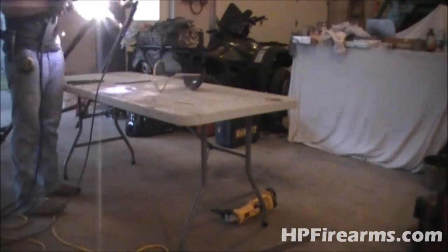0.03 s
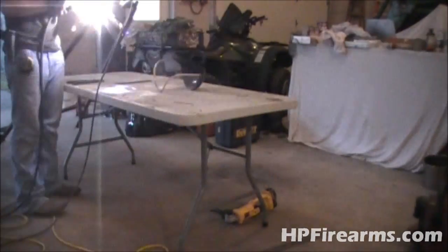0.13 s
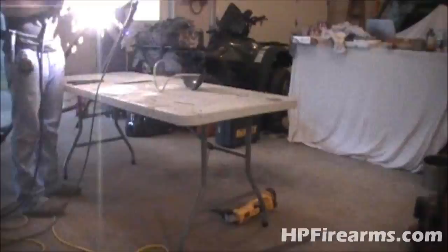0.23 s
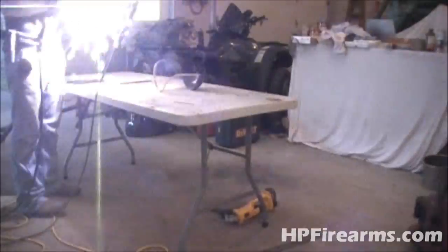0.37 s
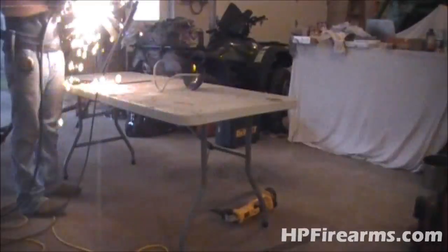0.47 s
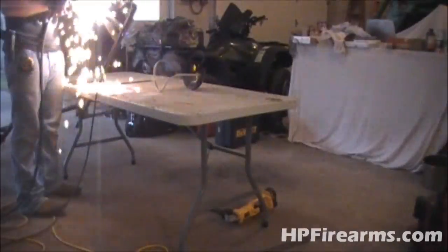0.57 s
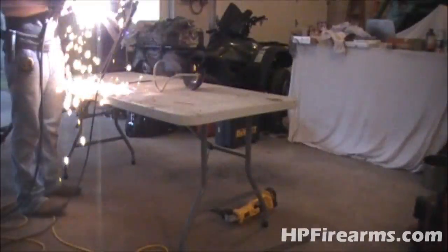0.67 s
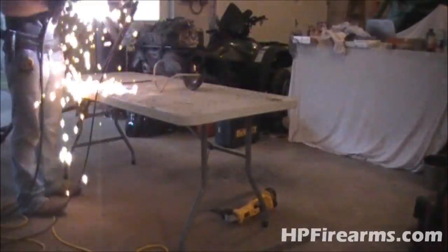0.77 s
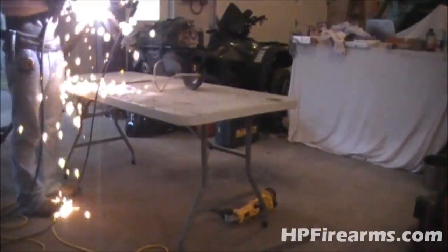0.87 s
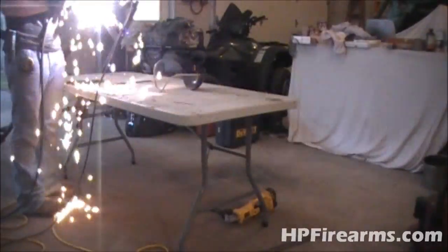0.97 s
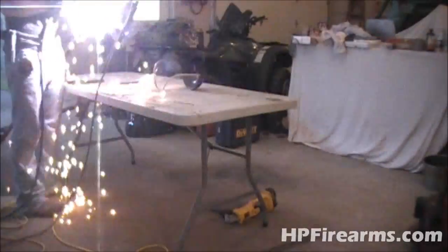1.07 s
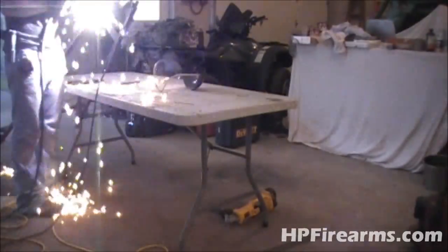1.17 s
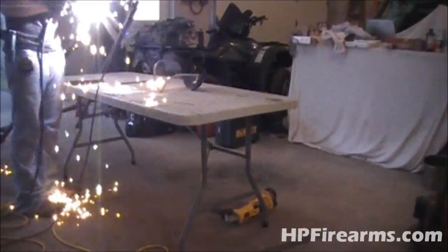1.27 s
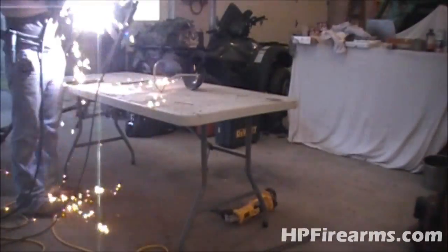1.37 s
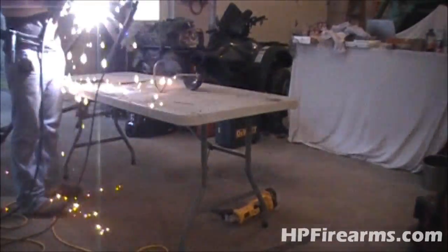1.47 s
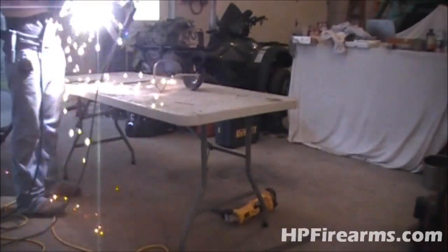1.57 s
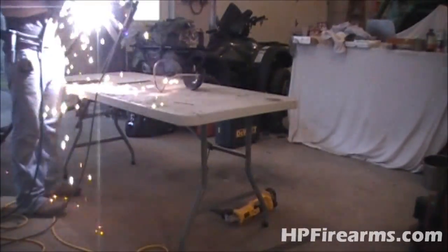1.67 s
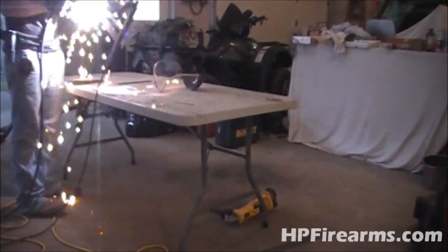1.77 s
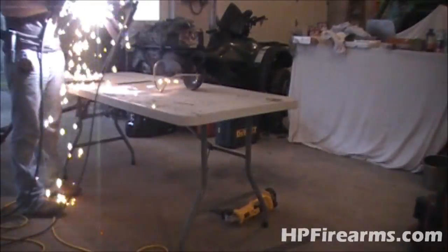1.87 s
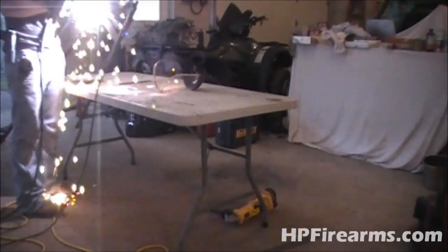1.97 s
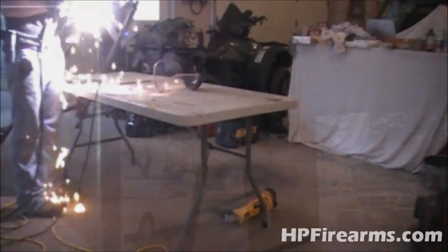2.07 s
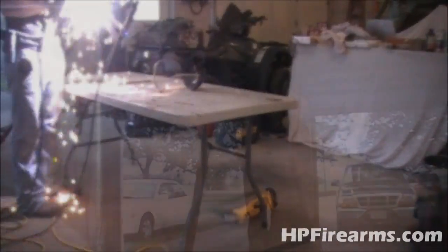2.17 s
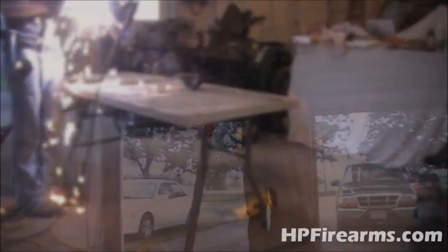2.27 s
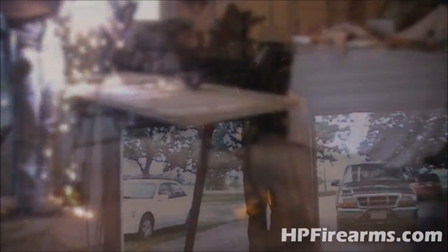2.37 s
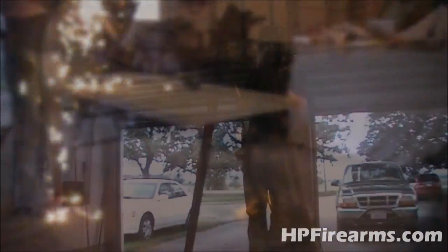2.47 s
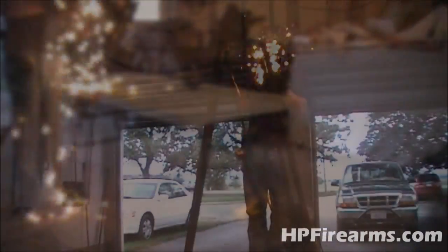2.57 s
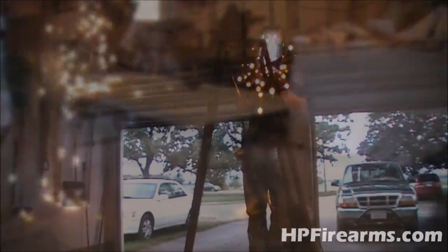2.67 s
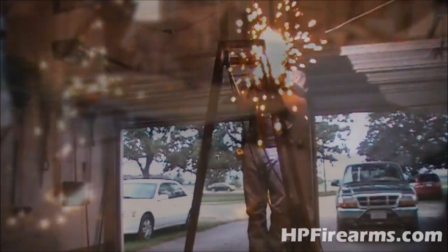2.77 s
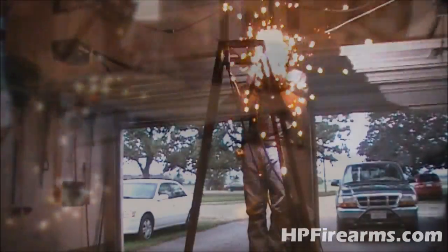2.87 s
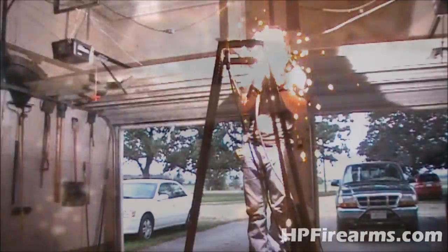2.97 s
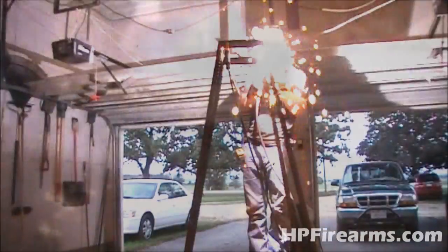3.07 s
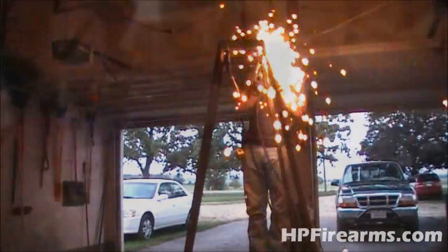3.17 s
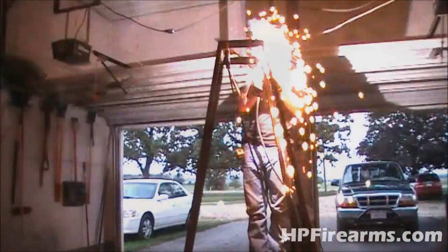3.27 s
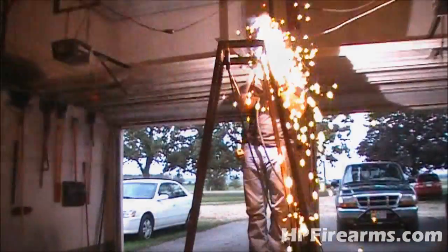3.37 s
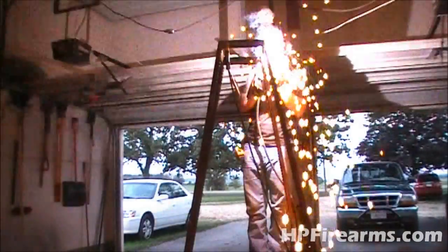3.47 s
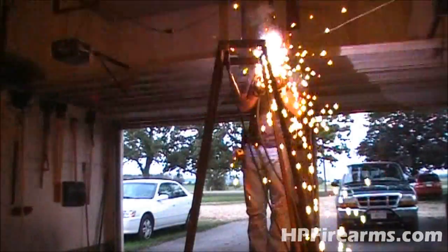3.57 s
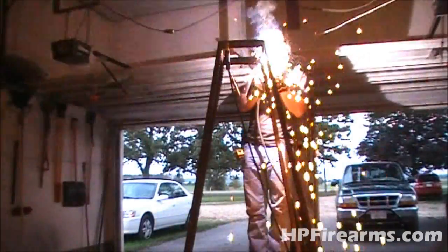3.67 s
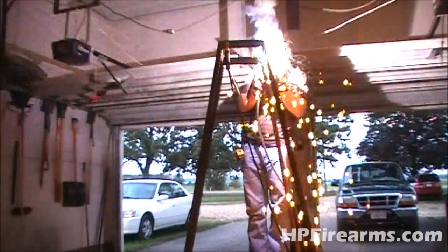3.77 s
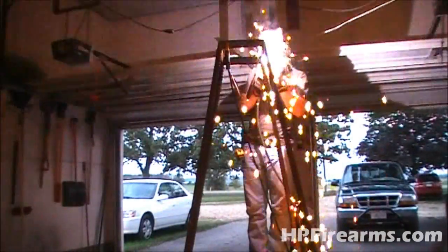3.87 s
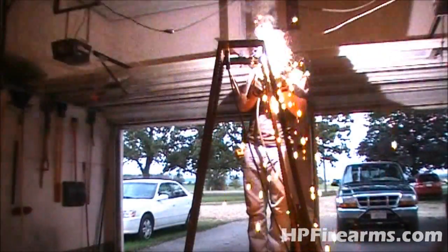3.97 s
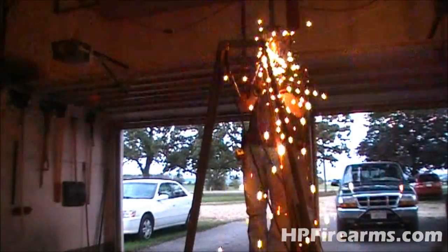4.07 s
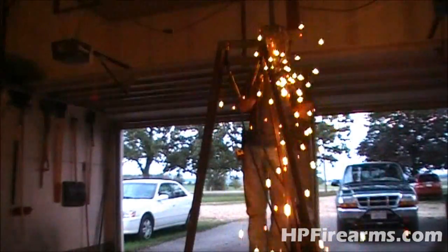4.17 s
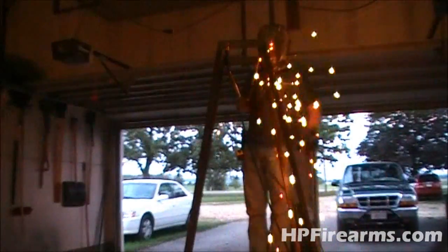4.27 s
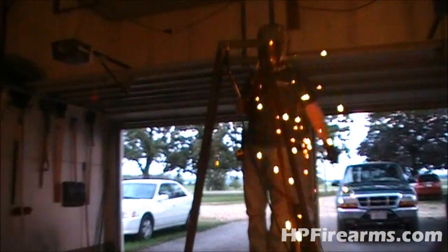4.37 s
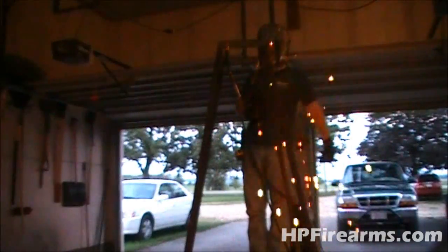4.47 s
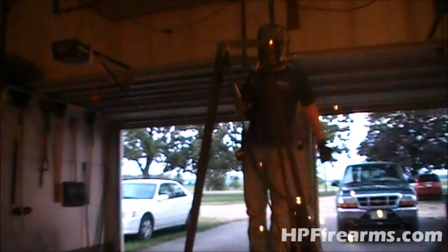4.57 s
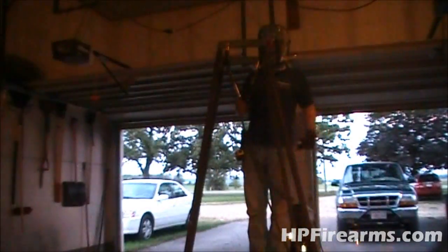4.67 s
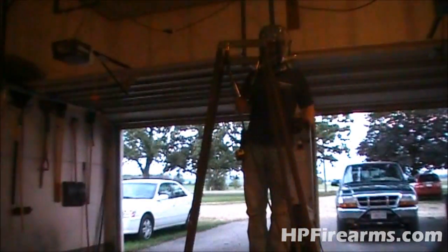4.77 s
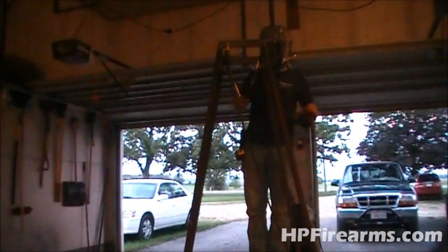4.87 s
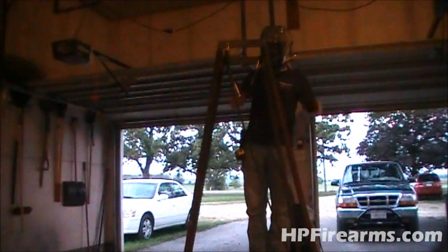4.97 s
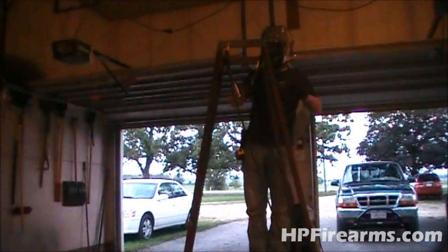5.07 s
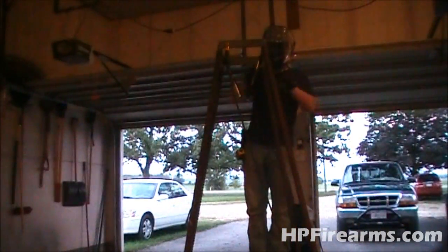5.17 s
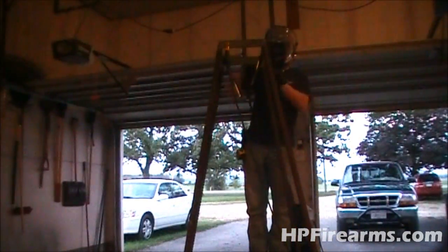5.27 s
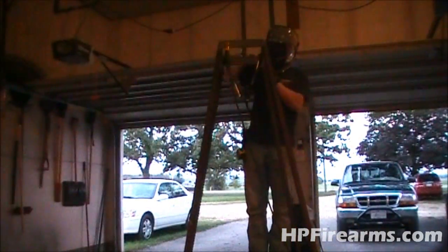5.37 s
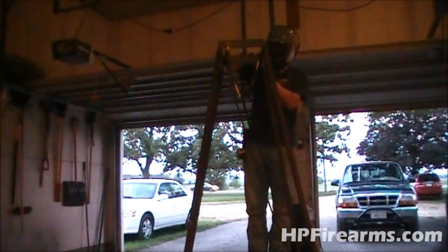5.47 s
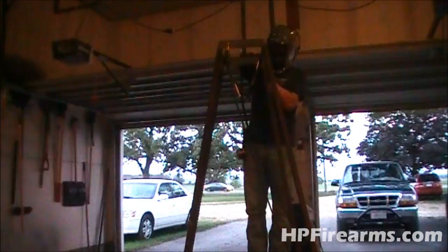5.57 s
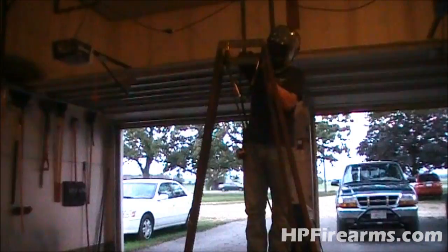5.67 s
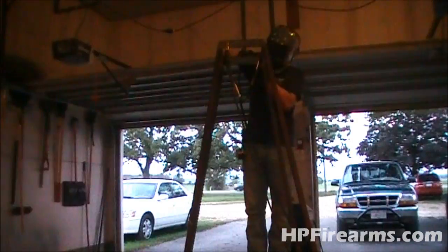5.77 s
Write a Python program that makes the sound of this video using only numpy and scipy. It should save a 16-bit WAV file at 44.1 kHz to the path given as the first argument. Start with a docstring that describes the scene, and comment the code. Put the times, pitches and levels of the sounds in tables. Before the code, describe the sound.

An electric arc welder is sizzling from the start, fairly close, in a bare, ringing garage. Its bright, dense crackle is dotted with sharp, irregular pops of bursting molten drops, brief stutters and faint whistles and hisses of gas. The welder's cooling fan whirs quietly underneath, joined by a low hum at about 2 seconds.

At around 2.5 seconds the arc dips and a second weld strikes with a cluster of loud cracks. It chokes for a moment, then burns on with more hiss and buzz, scattered pops and a few dull puffs. The arc stops just after 4 seconds and the room rings out briefly. The cooling slag ticks once at about 4.4 seconds. From there until the end, near 5.8 seconds, only the soft, slightly wavering whir of the fan and its low hum remain.

```python
"""A garage: arc welding at a bench, then overhead from a ladder by the open door.
The arc sizzles with tiny sparks that swell at twice the mains frequency. Molten drops choke it
and pop; gas whistles, hisses and puffs from the melt. The bare room rings on when the arc stops,
and the slag ticks once. The welder's cooling fan whirs underneath, at the ladder with a low hum."""
import sys
import numpy as np
from scipy import signal
from scipy.fft import rfft, irfft
from scipy.io import wavfile

SR = 44100
rng = np.random.default_rng(int(sys.argv[2]) if len(sys.argv) > 2 else 0)


def master(y):
    """Save y as 16-bit WAV."""
    cut = np.clip(np.atleast_2d(y).T, -1, 1)
    pcm = np.round(cut * 32767)  # scale
    wavfile.write(sys.argv[1], SR, pcm.astype(np.int16))


N = 257103
TIME = np.arange(N) / SR
MAINS_HZ = 60
LADDER_FROM_S, STRIKE_S = 2.0, 2.48  # ladder scene: fan comes in, arc is struck
RELIGHT_S = 0.0088  # time for the arc to catch
# Bursting drops. Each row: start in seconds, relative peak in dB, thump offset in dB.
DROP_BURSTS = [(0.0181, -2, -9), (0.04, -3, -8), (.0822, -11, -20), (0.0922, -5, -22), (0.166, -7, -9),
               (.1918, -2, -14), (.233, -0.5, -29), (0.2823, -1.5, -15), (.3245, -9, -22),
               (0.4748, 0, -4.5), (.4992, -5, -26), (0.5075, -8, -24), (.5397, -10, -24),
               (0.5427, -12, -24), (0.5797, -12, -24), (.6078, -11, -22), (.7183, -9, -21), (.79, -9, -26),
               (0.8433, -10, -15), (0.8905, -7, -22), (0.8936, -10, -22), (0.9416, -2.5, -26),
               (1.0395, -1, -10), (1.0817, -5, -25), (1.124, -8, -22), (1.191, -13, -22), (1.2185, -9, -20),
               (1.2245, -12, -16), (1.2498, -6.5, -16), (1.4336, -2.5, -15), (1.4485, -4, -14),
               (1.6833, -4.5, -32), (1.8484, -8, -23), (2.141, -6, -8), (2.2577, -3, -3),
               (2.2657, -10, -15.5), (2.3496, -5, -18), (2.3668, -6, -2), (2.3746, -9, -6),
               (2.408, -7, -20), (2.4247, -9, -20), (2.489, -3, -20), (2.4978, 2.5, -12),
               (2.4997, -0.5, -9), (2.5056, 3, -19), (2.6856, -6, -22), (2.6906, -2, -18),
               (2.7138, 2.5, -14), (2.7303, 3, -15), (2.7813, -5, -28), (2.798, -2, -22), (2.8713, -3, -22),
               (2.8863, 1, -26), (2.8947, -6, -24), (2.905, -1, -24), (2.9134, 0, -23), (3.2041, -0.5, -6),
               (3.231, 0, -10), (3.2455, -4, -19), (3.3152, 2, -20), (3.399, 2, -21), (3.5829, -4, -20),
               (3.6737, -2, -21), (3.9554, 3, -26), (3.9657, -1, -28), (4.0382, 4, -20)]


def amp(db):
    """Decibels to gain."""
    return 10 ** (np.asarray(db) / 20)


def unit_rms(x):
    """Scale to rms 1."""
    return x / np.sqrt(np.mean(x ** 2) + 1e-20)


def at_hz(points, hz):
    """Interpolate (Hz, value) rows on a log-frequency axis."""
    f, value = np.transpose(points)
    return np.interp(np.log(hz + 1), np.log(f), value)


def envelope(rows):
    """Gain per sample from (seconds, dB) rows."""
    s, db = np.transpose(rows)
    return amp(np.interp(TIME, s, db))


def arch(start_s, length_s):
    """Half-sine swell and fade."""
    return np.sin(np.pi * np.clip((TIME - start_s) / length_s, 0, 1))


def noise(gain_at):
    """Noise of rms 1, shaped by gain_at(Hz)."""
    return unit_rms(irfft(rfft(rng.standard_normal(N)) * gain_at(np.fft.rfftfreq(N, 1 / SR)), N))


def wander(hz, size=8192):
    """Random drift of rms 1, rolled off above hz."""
    bin_hz = np.arange(size // 2 + 1) / TIME[-1]
    slow = irfft(rfft(rng.standard_normal(size)) / (1 + (bin_hz / hz) ** 4), size)
    return np.interp(TIME, np.linspace(0, TIME[-1], size), unit_rms(slow))


def sine(hz):
    """Tone of rms 1 on a pitch curve."""
    return np.sqrt(2) * np.sin(2 * np.pi * np.cumsum(hz) / SR)


def snap(spectrum, size=2048):
    """Minimum-phase click of energy 1 from (Hz, dB) rows."""
    log_gain = np.log(amp(at_hz(spectrum, abs(np.fft.fftfreq(size, 1 / SR)))))
    click = np.fft.ifft(np.exp(np.conj(signal.hilbert(log_gain)))).real[:size // 2]
    return click / np.linalg.norm(click)


def convolve(x, response):
    """Convolve and trim to N samples."""
    return signal.oaconvolve(x, response)[:N]


def split(x, hz):
    """Parts below and above hz."""
    return [signal.sosfilt(signal.butter(3, hz, kind, fs=SR, output="sos"), x)
            for kind in ("low", "high")]


def band(x, low_hz, high_hz):
    """Zero-phase band-pass."""
    return signal.sosfiltfilt(signal.butter(2, [low_hz, high_hz], "band", fs=SR, output="sos"), x)


def resonate(x, hz, width_hz):
    """Resonator on a pitch curve."""
    carrier = np.exp(2j * np.pi * np.cumsum(hz) / SR)
    pole = np.exp(-np.pi * width_hz / SR)
    return 2 * (carrier * signal.lfilter([1 - pole], [1, -pole], x / carrier + 1e-18)).real


def echoed(x, echoes):
    """Add first reflections from (seconds, dB) rows."""
    return x + sum(amp(db) * np.pad(x, (round(s * SR), 0))[:N] for s, db in echoes)


def scattered(x, decay_s=0.0042):
    """Nearby clutter smears a sound over a few milliseconds."""
    taps = rng.standard_normal(1024) * np.exp(-TIME[:1024] / decay_s)
    return convolve(x, taps / np.linalg.norm(taps))


def room_tail(echoes_per_s=6000):
    """Diffuse response; each band dies at its own rate."""
    # Room decay. Each row: frequency in Hz, T60 in seconds.
    t60_s = [(150, 0.26), (1000, 0.65), (2200, 1.27), (4000, 1.12), (7000, 0.89), (10000, 0.73),
             (15000, 0.23)]
    onset = np.clip(TIME[:SR] / 0.0025 - .5, 0, 1)
    taps = rng.standard_normal(SR) * (rng.random(SR) < echoes_per_s / SR) * onset
    hz, t, bins = signal.stft(taps, SR, nperseg=256)
    taps = signal.istft(bins * amp(-60 * t / at_hz(t60_s, hz)[:, None]), SR, nperseg=256)[1]
    return taps / np.linalg.norm(taps)


def garage(x, drift_hz=0.607):
    """Room ring, shifting between two tails as arc and welder move."""
    phase = 2 * np.pi * drift_hz * TIME
    return convolve(x * np.cos(phase), room_tail()) + convolve(x * np.sin(phase), room_tail())


def microphone_pair(mid, diffuse):
    """Two close ports: alike in the bass, apart in the top treble."""
    # Stereo width. Each row: frequency in Hz, side gain in dB.
    width_db = [(60, -25), (130, -18), (200, -27), (330, -22.5), (650, -23), (1080, -15.5), (1750, -26),
                (2350, -16), (3000, -18.5), (5000, -17.5), (7200, -13), (8200, -5.5), (9300, 2), (10500, 4),
                (12000, 0.5), (15000, -3)]
    # Delay between ports. Each row: frequency in Hz, its share of the side signal.
    delay_share = [(500, 0.2), (4000, 0.1), (7200, 0.44), (9800, 0.26), (13000, 0.1)]
    # Balance. Each row: frequency in Hz, left over right in dB.
    balance_db = [(100, -0.5), (400, 0.6), (2000, 0.45), (6000, 0), (8500, -3.5), (10300, 3.5),
                  (13000, 4.5)]
    hz, centre = np.fft.rfftfreq(N, 1 / SR), rfft(mid)
    share = at_hz(delay_share, hz)
    side = amp(at_hz(width_db, hz)) * (1j * share * centre + np.sqrt(1 - share ** 2) * rfft(diffuse))
    lean = amp(at_hz(balance_db, hz) / 2)
    return irfft(np.array([(centre + side) * lean, (centre - side) / lean]), N)


def hum(hum_hz=66.8, octave_db=-9, rumble_db=-7, rumble_hz=110, width_hz=45):
    """Deep machine hum and its octave over a soft rumble; starts loud, then settles."""
    # Hum level. Each row: time in seconds, level in dB.
    levels = [(2.0, -47), (2.6, -62.5), (5.83, -61)]
    hz = hum_hz + 0.76 * wander(hz=2.9)
    rumble = noise(lambda f: 1 / (1 + ((f - rumble_hz) / width_hz) ** 4))
    return envelope(levels) * (sine(hz) + amp(octave_db) * sine(2 * hz) + amp(rumble_db) * rumble)


def fan_blades(throb_hz=7.2, throb_db=3, crest_s=3.01):
    """Blade tone, drifting and beating."""
    # Blade tone. Each row: time in seconds, pitch in Hz, level in dB.
    drone = [(0, 203.5, -46), (.15, 206, -46.5), (.33, 204.6, -54), (.48, 204, -51.5), (1.1, 198, -54),
             (1.8, 201, -49.5), (2.0, 202, -55), (2.35, 202.3, -44.5), (2.9, 206.6, -45), (3.8, 200.4, -44),
             (4.4, 196.8, -54), (5.83, 208.6, -57)]
    s, hz, db = np.transpose(drone)
    throb = np.cos(2 * np.pi * throb_hz * (TIME - crest_s) + 0.45 * wander(hz=0.54))
    level = amp(np.interp(TIME, s, db) + throb_db * throb + 0.93 * wander(hz=7.8))
    return level * sine(np.interp(TIME, s, hz) + wander(hz=14.0))


def fan(air_db=-35, hollow_db=-49, bench_db=-7, tone_width_hz=10):
    """Blades and rushing air with a hollow ring; breathy tones and hum join at the ladder."""
    # Air rush. Each row: frequency in Hz, density in dB.
    air_spectrum = [(25, -53), (60, -68), (150, -54), (250, -23), (290, -12.5), (540, -10.5), (780, -3.5),
                    (1100, -5.5), (1750, -8), (3200, -19.5), (7100, -23.5), (9500, -37.5), (14000, -54),
                    (15500, -75)]
    # Hollow air resonances. Each row: frequency in Hz, width in Hz, level in dB.
    modes = [(208.7, 11, 6), (226, 52, 4)]
    # Weaker fan tones. Each row: frequency in Hz, level in dB.
    lines = [(238, -58), (511.4, -61), (623, -50), (773, -56)]
    # Rush and tones at the ladder. Each row: time in seconds, gain in dB.
    rush_gain = [(2.0, 4), (2.55, 3), (4.35, 0.5), (4.57, -0.5), (4.9, -0.44), (5.83, 3)]
    tone_gain = [(2.0, 9), (3.2, 8.5), (4.35, -3), (5.0, 2), (5.83, 10)]
    air = noise(lambda f: amp(at_hz(air_spectrum, f))) * amp(.5 * wander(hz=3.2))
    hollow = noise(lambda f: sum(amp(db) / (1 + (2 * (f - hz) / width_hz) ** 2) ** 0.77
                                 for hz, width_hz, db in modes))
    rush = amp(air_db) * air + amp(hollow_db) * hollow
    tones = sum(amp(db) * noise(lambda f: 1 / (1 + (2 * (f - hz) / tone_width_hz) ** 2))
                for hz, db in lines)
    blades = fan_blades()
    at_ladder = envelope(rush_gain) * rush + envelope(tone_gain) * tones + hum()
    crossfade = np.clip((TIME - LADDER_FROM_S) / .02 + .5, 0, 1)
    return blades + (1 - crossfade) * amp(bench_db) * rush + crossfade * at_ladder


def fan_whines(waver_hz=5):
    """Thin, wavering tones swell and fade in the fan's air."""
    # Each row: start in seconds, length in seconds, pitch in Hz, level in dB.
    whines = [(.25, 0.65, 883, -46), (4.95, 0.23, 772, -46), (5.295, 0.26, 836, -46)]
    return sum(amp(db) * arch(start_s, length_s) * sine(hz + waver_hz * wander(hz=30.4))
               for start_s, length_s, hz, db in whines)


def slag_tick(start_s=4.3785, peak_db=-12.5):
    """Slag ticks once as the weld cools."""
    # Tick colour. Each row: frequency in Hz, density in dB.
    spectrum = [(200, -30), (1200, 0), (3500, -10), (7200, -8), (8400, -18), (15000, -45)]
    tick, out = snap(spectrum), np.zeros(N)
    out[round(start_s * SR):][:len(tick)] = amp(peak_db) * tick / abs(tick).max()
    return out


def gas_whistles(width_hz=360, sag_hz_per_s=550):
    """Gas rushes through one narrow, sinking resonance."""
    # Each row: start in seconds, length in seconds, pitch in Hz, level in dB.
    whistles = [(0, 0.049, 2220, -33.5), (0.133, 0.064, 2160, -29.5), (0.387, 0.089, 1940, -33),
                (0.876, 0.07, 2130, -35), (1.14, 0.12, 2400, -35), (1.35, 0.12, 2580, -37),
                (2.579, 0.13, 2188, -31), (4.031, 0.17, 2200, -34)]
    out = np.zeros(N)
    for start_s, length_s, hz, db in whistles:
        t = np.arange(0, length_s, 1 / SR)
        pitch_hz = hz - sag_hz_per_s * (t - length_s / 2)
        breath = resonate(rng.standard_normal(len(t)), pitch_hz, width_hz)
        breath = unit_rms(resonate(breath, pitch_hz, width_hz))
        out[round(start_s * SR):][:len(t)] += amp(db) * np.sin(np.pi * t / length_s) * breath
    return out


def gas_jets(jet_hz=9800, width_hz=1800):
    """Hot gas jets from the arc with a thin, high hiss."""
    # Each row: start in seconds, length in seconds, level in dB.
    jets = [(0, 0.12, -29.5), (1.305, 0.11, -32), (2.0, 0.13, -31)]
    level = sum(amp(db) * arch(start_s, length_s) for start_s, length_s, db in jets)
    return level * noise(lambda f: 1 / (1 + (2 * (f - jet_hz) / width_hz) ** 4))


def gas_puffs(rise_s=0.002, decay_s=0.0075, knee_hz=720, cutoff_hz=2450):
    """Trapped gas blows out of the melt in dull puffs."""
    # Each row: start in seconds, level in dB.
    puffs = [(.473, -23), (2.712, -16), (2.729, -22), (2.795, -27), (3.32, -23), (3.697, -21), (4.03, -24)]
    level = np.zeros(N)
    for start_s, db in puffs:
        t = np.maximum(TIME - start_s, 0)
        level += amp(db) * np.minimum(t / rise_s, 1) * np.exp(-np.maximum(t - rise_s, 0) / decay_s)
    return level * noise(lambda f: 1 / (1 + (f / cutoff_hz) ** 8 * (1 - 1 / (1 + (f / knee_hz) ** 4))))


def drop_pops(bursts, spectrum, gain_db, thump_db, ring_hz=7100, ring_s=0.00078, ring_db=-7):
    """A bursting drop gives a bright crack and a short, dull push of pressure."""
    # Pressure push. Each row: frequency in Hz, level in dB, decay in seconds.
    modes = [(1720, 0, 0.00023), (3800, -0.5, 0.00047)]
    click = snap(spectrum)
    t = TIME[:len(click)]
    ring = amp(ring_db) * np.exp(-t / ring_s) * np.cos(2 * np.pi * ring_hz * t - 1)
    crack = split(click / abs(click).max() + ring, hz=12100)[0]
    crack /= abs(crack).max()
    thump = sum(amp(db) * np.exp(-t / decay_s) * np.cos(2 * np.pi * hz * t) for hz, db, decay_s in modes)
    thump = split(split(thump, hz=597)[1], hz=5450)[0]
    out = np.zeros(N + len(t))
    for start_s, peak_db, offset_db in bursts:
        pop = crack + amp(offset_db + thump_db) * thump
        out[round(start_s * SR):][:len(t)] += amp(peak_db + gain_db) * pop
    return out[:N]


def choking_db(choke_s=0.0034, flare_share=0.072, flare_s=0.019):
    """The arc sinks while a drop bridges the gap and flares on relighting."""
    # Each row: start in seconds, length in seconds, depth in dB.
    chokes = [(0.197, 0.036, 22), (0.262, 0.056, 11), (0.388, 0.061, 3.5), (0.543, 0.05, 3),
              (0.73, 0.054, 7), (0.797, 0.037, 1.5), (0.944, 0.038, 4), (1.077, 0.034, 14),
              (1.45, 0.061, 1.5), (1.854, 0.019, 15), (1.887, 0.097, 1.5), (2.145, 0.04, 2),
              (2.277, 0.073, 2), (2.527, 0.153, 22), (2.73, 0.044, 13), (2.93, 0.066, 7), (3.137, 0.06, 14),
              (3.447, 0.035, 3.5)]
    db = np.zeros(N)
    for start_s, length_s, depth_db in chokes:
        since_s = TIME - start_s - length_s
        choked = np.clip((TIME - start_s) / choke_s, 0, 1)
        relit = np.clip(since_s / RELIGHT_S, 0, 1)
        flare = flare_share * relit * np.exp(-np.maximum(since_s, 0) / flare_s)
        db += depth_db * (relit - choked + flare)
    return db


def spits(per_s=300, low_hz=6300, high_hz=7800, spread_db=4, ring_s=.0005):
    """Larger sparks ping, each at its own pitch."""
    t = TIME[:256]
    starts = np.flatnonzero(rng.random(N - len(t)) < per_s / SR)
    out = np.zeros(N)
    for i, (pitch, size, phase) in zip(starts, rng.random((len(starts), 3))):
        hz = low_hz + pitch * (high_hz - low_hz)
        level = amp(-spread_db * np.log(size + 0.35))
        out[i:i + len(t)] += level * np.exp(-t / ring_s) * np.sin(2 * np.pi * (hz * t + phase))
    return unit_rms(out)


def sparks(per_s, spread_db, hiss):
    """Random discharges, a few of them large, over plasma hiss."""
    size = amp(spread_db * np.minimum(rng.exponential(1, N), 3)) * rng.choice([-1, 1], N)
    discharges = unit_rms(size * (rng.random(N) < per_s / SR))
    return unit_rms(discharges + hiss * rng.standard_normal(N))


def arc(levels, spectrum, per_s, spread_db, hiss, buzz_db, buzz_turns, sizzle_db, sputter_db,
        spits_db, flutter_db, flicker_db=1.1, die_s=0.018, sputter_choke_share=0.65):
    """Sparks swell each mains half cycle, sputter as the metal melts and die as the rod lifts."""
    s, level_db, offset_db = np.transpose(levels)
    buzz = np.cos(2 * np.pi * (2 * MAINS_HZ * TIME + buzz_turns))
    swell = amp(buzz_db * buzz + flicker_db * wander(hz=87))
    low, high = split(convolve(sparks(per_s, spread_db, hiss) * swell, snap(spectrum)), hz=2650)
    high = unit_rms(high) + amp(spits_db) * unit_rms(spits() * swell)
    burning = np.clip((TIME - s[0]) / RELIGHT_S, 0, 1) * np.exp(-np.maximum(TIME - s[-1], 0) / die_s)
    level = burning * amp(np.interp(TIME, s, level_db) + flutter_db * wander(hz=25))
    choke_db = choking_db()
    sizzle = amp(sizzle_db + choke_db) * unit_rms(high)
    low_db = sputter_db + np.interp(TIME, s, offset_db) + sputter_choke_share * choke_db
    return level * (sizzle + amp(low_db) * unit_rms(low))


def bench_weld():
    """Spitting arc and bursting drops, reflected off the bench; no deep bass."""
    # Arc drift. Each row: time in seconds, level in dB, sputter offset in dB.
    levels = [(-.02, -12.5, -3), (.03, -20.5, -8.5), (.12, -23, -3), (.175, -19, -6.5), (.24, -21.5, -7),
              (.33, -22.5, -6.5), (.46, -23.5, -2), (.56, -22, -11), (.68, -20, -6), (.82, -23.5, -7.5),
              (.9, -20, -7.5), (1.0, -20.5, -13), (1.15, -24.5, -5), (1.25, -24, -5.5), (1.38, -19.5, -5.5),
              (1.49, -21, -9), (1.545, -18.5, -5.5), (1.65, -20, -3.5), (1.845, -20, -3),
              (1.87, -20.5, -17), (1.97, -19.5, -6.5), (2.06, -19, -3.5), (2.2, -22, -2.5),
              (2.44, -23, -0.5)]
    # Spark and crack colours. Each row: frequency in Hz, density in dB.
    spark_spectrum = [(30, -73), (70, -57), (150, -22.5), (300, -19.5), (800, -13.5), (1900, -9),
                      (2900, -8), (4200, -1.5), (7100, -1), (8600, -5), (10200, -9), (12000, -12.5),
                      (14300, -21), (15800, -37)]
    crack_spectrum = [(100, -45), (800, -19), (2000, -12), (4000, -5), (7100, -1), (9000, -5), (11500, -7),
                      (14300, -15), (15800, -32)]
    # Sizzle mid band. Each row: time in seconds, gain in dB.
    mid_gain = [(0, -2), (.7, -2.5), (1.0, -4.5), (1.2, -.5), (1.55, -.5), (1.8, -2), (1.9, -3),
                (2.1, -0.5), (2.44, -2.5)]
    # Reflections; point-like cracks reflect cleanly. Each row: delay in seconds, gain in dB.
    arc_echoes = [(.00243, -20.5), (.0033, -37), (.0079, -24)]
    crack_echoes = [(.00243, -10.5), (.0033, -17)]
    sizzle = arc(levels, spark_spectrum, per_s=3200, spread_db=2.5, hiss=0.27, buzz_db=1.0,
                 buzz_turns=-0.15, sizzle_db=-1.67, sputter_db=-4.5, spits_db=-1.0, flutter_db=-0.03)
    sizzle += (envelope(mid_gain) - 1) * band(sizzle, 2700, 5600)
    bursts = [row for row in DROP_BURSTS if row[0] < STRIKE_S]
    cracks = drop_pops(bursts, crack_spectrum, gain_db=2.0, thump_db=-7.0)
    return split(echoed(sizzle, arc_echoes) + echoed(cracks, crack_echoes), hz=129)[1]


def ladder_weld():
    """Overhead arc with more hiss and buzz, bursting drops, then the slag tick."""
    # Arc drift. Each row: time in seconds, level in dB, sputter offset in dB.
    levels = [(2.482, -13, -23), (2.56, -16, 2), (2.69, -18.5, -0.5), (2.8, -20, -6), (2.98, -18.5, -4.5),
              (3.11, -17.5, -4.5), (3.3, -18.5, -4.5), (3.58, -19.5, -6.5), (3.78, -17.5, -6),
              (3.98, -19, -8.5), (4.042, -14.5, -7.5)]
    # Spark and crack colour. Each row: frequency in Hz, density in dB.
    spectrum = [(60, -43), (150, -30), (300, -13.5), (600, -8), (1000, -3.5), (1900, -2), (3200, -1.5),
                (5400, 2.5), (6300, 5), (7100, 6.5), (7900, 3.5), (8600, -1), (10200, -5.5), (12000, -9.5),
                (14300, -18), (15500, -77)]
    # Nearby surfaces. Each row: delay in seconds, gain in dB.
    echoes = [(.00116, -26), (.00342, -33), (.0067, -54), (0.0123, -25)]
    sizzle = arc(levels, spectrum, per_s=4200, spread_db=2.0, hiss=0.68, buzz_db=3.0,
                 buzz_turns=0.25, sizzle_db=-4.5, sputter_db=-5.0, spits_db=-13.0, flutter_db=1.37)
    bursts = [row for row in DROP_BURSTS if row[0] >= STRIKE_S]
    cracks = drop_pops(bursts, spectrum, gain_db=-3.0, thump_db=0.5)
    return echoed(sizzle + cracks + slag_tick(), echoes)


def scene():
    """Two welds, the room and the fan, in stereo."""
    bench, ladder = bench_weld(), ladder_weld()
    gas, puffs = gas_whistles() + gas_jets(), gas_puffs()
    direct = bench + ladder + gas + puffs
    into_room = amp(-5.5) * (bench + gas) + amp(-1) * ladder + amp(-6) * puffs
    into_room += amp(-12.5) * band(bench, 200, 2500)
    # the dull part of the bench weld arrives mostly off the side walls
    sideways = scattered(direct) + garage(into_room + amp(7) * split(bench, hz=1400)[0])
    fan_low, fan_high = split(fan(), hz=4970)
    mid = direct + garage(into_room) + fan() + fan_whines()
    return microphone_pair(mid, sideways + amp(6) * fan_low + amp(-1) * fan_high)


def gain_control(x, threshold_db=-0.5, recovery_db_per_s=110, lag_s=0.0012):
    """Duck after each loud crack, too late to catch the crack itself."""
    over_db = np.maximum(20 * np.log10(abs(x).max(0) + 1e-9) - threshold_db, 0)
    recovery_db = TIME * recovery_db_per_s
    duck_db = np.maximum.accumulate(over_db + recovery_db) - recovery_db
    lag = round(lag_s * SR)
    return x / amp(signal.lfilter(np.hanning(2 * lag) / lag, 1, duck_db))


def record(dry, ceiling=.86, low_cut_hz=45, high_cut_hz=15500):
    """Gain control, clipping of the loudest cracks, bass cut, band limit."""
    clipped = np.clip(gain_control(dry), -ceiling, ceiling)
    thinned = signal.sosfilt(signal.butter(2, low_cut_hz, "high", fs=SR, output="sos"), clipped)
    low_pass = signal.firwin(255, high_cut_hz, window=("kaiser", 9), fs=SR)
    return signal.oaconvolve(thinned, low_pass[None], "same")


dry = scene()
out = record(dry)
master(out)
```